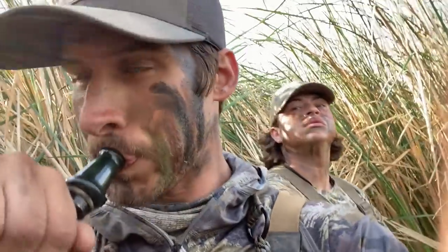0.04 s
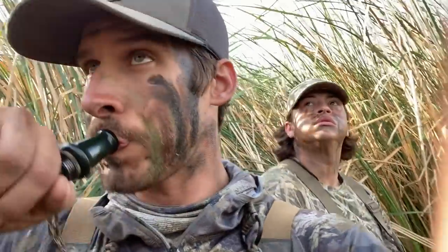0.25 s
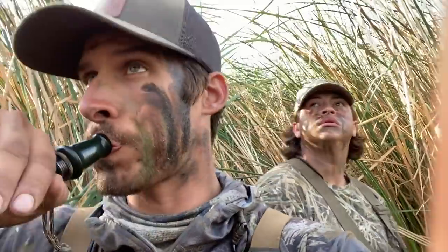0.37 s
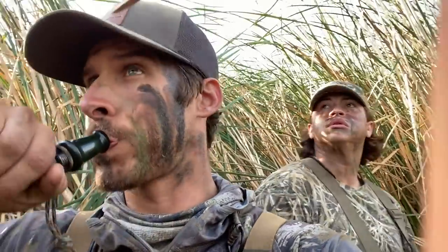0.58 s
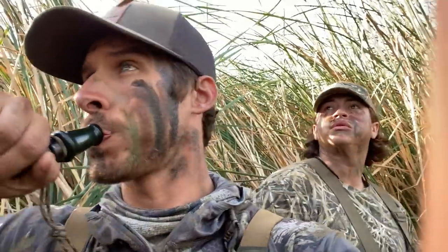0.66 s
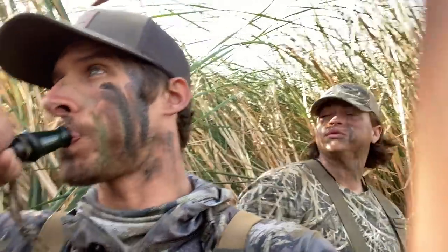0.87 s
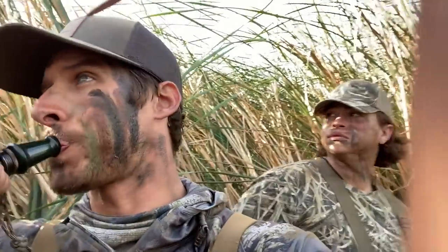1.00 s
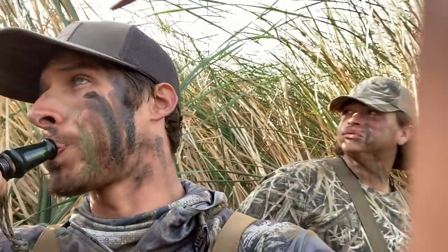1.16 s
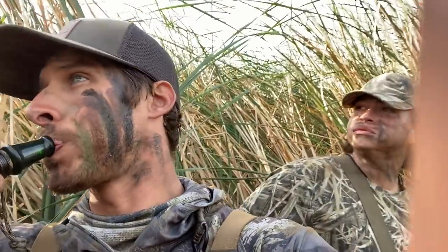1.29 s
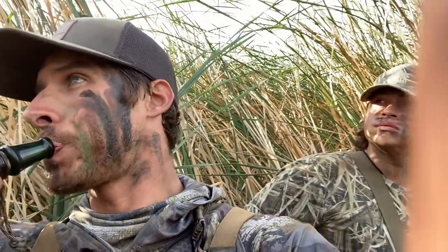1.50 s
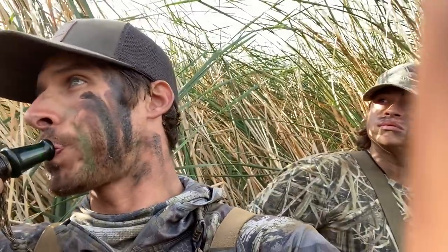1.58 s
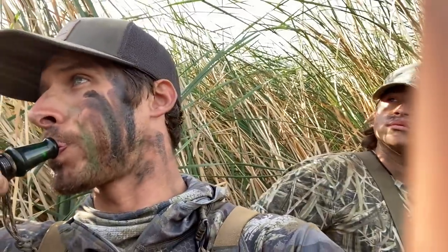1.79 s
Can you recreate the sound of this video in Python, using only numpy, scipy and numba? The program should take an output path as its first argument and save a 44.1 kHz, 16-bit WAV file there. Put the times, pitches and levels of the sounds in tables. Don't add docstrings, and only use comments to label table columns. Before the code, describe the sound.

Three short, evenly spaced nasal duck-call quacks blown close by, getting weaker, in a quiet marsh

```python
import sys
import numpy as np
from scipy import signal
from scipy.fft import rfft, irfft
from scipy.io import wavfile
from numba import njit

SR = 44100
rng = np.random.default_rng(int(sys.argv[2]) if len(sys.argv) > 2 else 0)


def dump(signal):
    limited = np.clip(np.atleast_2d(signal).T, -1, 1)
    pcm = np.round(limited * 32767).astype(np.int16)
    wavfile.write(sys.argv[1], SR, pcm)


def volts(x):
    e = np.asarray(x, float) / 20
    return 10 ** e


N = 81585
T = np.arange(N) / SR
QUACK = (T / .62).astype(int)

# start_s, level_db
FREE = [
    (.378, -61.5),
    (0.994, -42),
    (1.618, -45.5),
]


def level(x, db):
    return x * volts(db) / np.sqrt(np.mean(x ** 2))


@njit
def svf(x, hz, width):
    y, band_state, low_state = np.empty(len(x)), 0., 0.
    for i in range(len(x)):
        g, k = np.tan(np.pi * hz[i] / SR), width / hz[i]
        v = (band_state + g * (x[i] + 1e-18 - low_state)) / (1 + g * (g + k))
        band_state, low_state, y[i] = 2 * v - band_state, low_state + 2 * g * v, k * v
    return y


def band(x, hz, width, order=2):
    for _ in range(order):
        x = svf(x, hz + np.zeros(len(x)), 1. * width)
    return x


def noise_band(hz, width, db):
    return level(band(rng.standard_normal(N), hz, width), db)


def colour(x, points, lead=((0, 0), (1, 0))):
    f, p = np.arange(N // 2 + 1) * SR / N + 1, np.array(points)
    gain = volts(np.interp(np.log(f), np.log(p[:, 0] + 1), p[:, 1]))
    delay = np.exp(-1j * np.interp(f, *np.array(lead).T))
    return irfft(rfft(x) * gain * delay, N)


def clicks(times, sizes):
    out, at = np.zeros(N + 32), times * SR
    k = at.astype(int)[:, None] + np.arange(-7, 9)
    d = k - at[:, None]
    np.add.at(out, k, sizes[:, None] * np.sinc(d) * np.cos(np.pi * d / 16) ** 2)
    return out[:N]


def marsh():
    # time_s, level_db
    background_level = [(0.0, -58.5), (0.144, -60), (0.17, -54), (0.314, -66.5), (0.406, -74.5), (0.69, -64.5),
                        (0.772, -66.5), (0.886, -64), (1.06, -73), (1.122, -68), (1.144, -73.5), (1.442, -69.5),
                        (1.566, -65), (1.628, -77), (1.834, -68.5), (1.85, -90.5)]
    # pitch_hz, level_db
    rumble = [(25, -19.5), (50, -5), (88, 1.5), (130, -6), (180, -11.5), (260, -22.5), (400, -30.5)]
    # pitch_hz, density_db_per_hz
    hush_points = [(240, -30), (400, -12), (700, -17), (2150, -12), (2900, -28), (8000, -31), (10500, -41),
                   (14000, -39)]
    db = np.interp(T, *np.array(background_level).T)
    points = [(10, -47.5)] + rumble + [(800, -58.5)]
    mid, side = (level(colour(rng.standard_normal(N), points), 0) for _ in range(2))
    wind = mid + volts(-10.5) * side * np.array([[1], [-1]])
    hush = np.array([level(colour(rng.standard_normal(N), hush_points), -84.5) for _ in range(2)])
    return volts(db) * wind + hush * volts(.93 * (db + 71.5))


def echo(voice):
    # level_db per quack, the first one blown before the start
    reeds_db = [-51.5, -47, -39, -37.5]
    bank_db = [-7.5, -16, -28.5, -27]
    early = SR
    reed_t60_s, bank_s, bank_spread_s = .42, .27, .043

    def send(db):
        return np.concatenate([voice[:early] * volts(db[0]), voice * volts(db[QUACK + 1])])

    def back(sent, tail):
        return signal.fftconvolve(sent, tail * rng.standard_normal(N) / 30)[early:][:N]

    reeds, bank = send(np.array(reeds_db)), send(np.add(reeds_db, bank_db))
    reeds_tail = volts(-60 * T / reed_t60_s)
    bank_tail = np.exp(-((T - bank_s) / bank_spread_s) ** 2 / 2)
    return np.array([back(reeds, reeds_tail) + back(bank, bank_tail) for _ in range(2)])


def taps():
    # start_s, peak_db, pitch_hz
    knocks = [
        (0.131, -48.5, 490),
        (0.183, -48.5, 312),
        (0.627, -58, 412),
        (0.772, -58.5, 416),
        (1.411, -61, 458),
    ]
    # time_s, level_db
    stems = [
        (0.03, -63),
        (.116, -71.5),
        (0.09, -71),
    ]
    t60_s, edge_db = .022, -14
    out = 0
    for s, db, hz in knocks:
        u = np.clip(T - s, 0, 1)
        swell = volts(db - 60 * u / t60_s) * (1 - np.exp(-u / .001))
        edge = volts(edge_db) * np.sin(2 * np.pi * 3.2 * hz * u)
        out = out + swell * (np.sin(2 * np.pi * hz * u) + edge)
    dry_stems = noise_band(7300, 5000, 0)
    return out + dry_stems * sum(volts(db) * np.exp(-((T - s) / .0014) ** 2) for s, db in stems)


def leak():
    # start_s, level_db
    first_air = [
        (0.198, -60),
        (.797, -70),
        (1.423, -77.5),
    ]
    rise_db_per_s, length_s = 200, .04
    air = noise_band(3900, 350, 0) + noise_band(5700, 900, -16) + noise_band(1800, 1500, -5)
    swell = 0
    for s, db in first_air:
        rise = volts(db + rise_db_per_s * np.clip(T - s, 0, length_s))
        swell = swell + np.clip((T - s) / .0082, 0, 1) * (T < s + length_s) * rise
    return air * swell


def limp(times):
    # time_s, limp_ms, share of groups longer than a pair (0-1)
    table = np.array([(.235, .1, 0), (.25, .2, .1), (.27, .12, 0), (.3, .4, .3), (.35, .35, .5),
                      (.365, .12, 0), (.845, .1, 0), (.865, .22, 0), (.875, .33, 0), (.895, .4, 0),
                      (.9, .36, 0), (.93, .25, 0), (.96, .3, 0), (.99, .1, 0), (1.47, .08, 0),
                      (1.505, .05, 0), (1.52, .4, .5), (1.54, .08, 0), (1.555, .4, 0), (1.59, .3, 0),
                      (1.615, .1, 0)])
    luck = rng.random((len(times), 2))
    place, i = np.zeros(len(times)), 0
    while i < len(times):
        more = np.interp(times[i], table[:, 0], table[:, 2])
        size = 2 + (luck[i, 0] < more) * (1 + (luck[i, 1] < .3))
        place[i:i + size] = np.linspace(.5, -.5, size)[:len(times) - i]
        i += size
    return place * np.interp(times, table[:, 0], table[:, 1]) / 1000, place


def ringing(slaps, soft, bore_db, bore_hz):
    # pitch_hz, width_hz, level_db
    modes = [(780, 120, 2), (1084, 638, 2.5), (1564, 280, 7)]
    barrel = level(sum((-1) ** k * volts(d) * band(soft, f, w) for k, (f, w, d) in enumerate(modes)), 0)
    bore = band(slaps, 2175, 1800)
    upper = band(bore, 2471 + bore_hz - 2100, 393, order=1)
    bore = level(band(bore, bore_hz, 478, order=1) - volts(-5.5) * upper, 0)
    return barrel + volts(bore_db) * bore


def reed_tone(turns, hz, starts):
    octave_db = [-4.5, -21, -50.5]
    octave = volts(np.interp(T, starts, octave_db)) * np.clip((hz - 300) / 50, 0, 1)
    return volts(-16) * np.sin(2 * np.pi * turns) + octave * np.sin(4 * np.pi * turns)


def air_flow(gain, bore_db):
    air_db = [-2.5, -1, -1.5]
    fade_db = [-59, -36, -44.5]
    pole = 1 / (.0025 * SR)
    flow = signal.lfilter([pole], [1, pole - 1], gain * volts(.5 * bore_db + np.array(air_db)[QUACK]))
    for (s, _), db in zip(FREE, fade_db):
        flow = flow + np.clip((T - s) / .004, 0, 1) * volts(db - 1210 * np.abs(T - s))
    return flow


def air_hiss(slaps, flow):
    # pitch_hz, width_hz, level_db
    modes = [(3916, 1190, 7), (5800, 990, -1), (7704, 1570, -2.5), (9510, 2000, -7.5), (11780, 1300, -11.5),
             (14040, 760, -27.5)]
    low_db = [-5, -2, 1.5]
    top_db = [3.5, -2, -3]
    gate = signal.lfilter([1], [1, -np.exp(-360 / SR)], np.abs(slaps))
    air = [level(gate * rng.standard_normal(N), 0) for _ in range(3)]
    shared = air[0] + level(slaps, -3.5)

    def ring(x):
        out = 0
        for k, (f, w, db) in enumerate(modes):
            db = db + (k == 0) * np.array(low_db)[QUACK] + (k > 3) * np.array(top_db)[QUACK]
            out = out + (-1) ** k * volts(db) * band(x, f, w)
        return out

    return [level(ring(shared + volts(-6) * own), -12) * flow for own in air[1:]]


def call():
    # time_s, bore_ring_db, slap_rate_hz, barrel_re_bore_db, bore_centre_hz
    first = [
        (0.226, -47, 310.2, 11, 1814),
        (0.246, -11.5, 365.5, -11, 1890),
        (0.266, -12, 361.1, -12.5, 2116),
        (0.354, -18.5, 367.1, -15.5, 2159),
        (0.37, -25, 386.2, -9.5, 2150),
        (0.388, -56.5, 391, -6.5, 2130),
    ]
    second = [
        (0.828, -50, 292.1, 20, 2034),
        (0.835, -45.5, 296, 2.5, 2012),
        (0.854, -20.5, 356, -8.5, 2007),
        (0.876, -16.5, 348.9, -10.5, 2055),
        (.898, -15.5, 353.5, -10.5, 2099),
        (0.907, -19, 353.4, -11.5, 2110),
        (0.946, -21.5, 380.5, -9.5, 2081),
        (0.974, -21, 378, -11.5, 2110),
        (0.988, -30, 403, -4.5, 2096),
        (0.997, -41.5, 416.1, 8, 2083),
    ]
    third = [
        (1.452, -52, 295, 11.5, 2061),
        (1.458, -51.5, 298.6, 4, 2104),
        (1.476, -28, 347.6, -10, 2100),
        (1.512, -17.5, 358.6, -10, 2142),
        (1.582, -23.5, 363.3, -12, 2073),
        (1.611, -33, 402.9, -5, 2070),
        (1.623, -74.5, 403.8, 24, 2026),
    ]
    # centre_hz for each quack, width_hz
    notches = [([570, 650, 670], 240), ([3250, 3200, 3150], 350), ([3300, 3300, 3250], 350),
               ([10600] * 3, 900)]
    catch_sag, catch_s = .2, .006493
    jitter_ms, scatter_db, group_lead_db, barrel_limp, wobble_db = .03, .9, -1, 1.4, 1.5

    quacks = (first, second, third)
    starts = [q[0][0] for q in quacks]
    rows = np.vstack(quacks)
    ring_db, hz, barrel_db, bore_hz = (np.interp(T, rows[:, 0], rows[:, k]) for k in range(1, 5))
    bore_db = -barrel_db
    on = sum(np.clip(np.minimum(5 * (T - q[0][0]), q[-1][0] - T) / .0043, 0, 1) for q in quacks)
    gain = on * volts(ring_db + barrel_db)

    hz = hz * (1 - catch_sag * sum((T >= s) * np.exp(-np.abs(T - s) / catch_s) for s in starts))
    turns = np.cumsum(hz) / SR
    for s in starts:
        turns[T >= s] += (.6 - np.interp(s, T, turns)) % 1

    beat = np.interp(np.arange(2, int(turns[-1]) - 1), turns, T)
    shift, place = limp(beat)
    luck = rng.standard_normal((len(beat), 2))
    beat = beat + luck[:, 0] * jitter_ms / 1000
    size = volts(scatter_db * luck[:, 1] + group_lead_db * place)
    slaps = clicks(beat + shift, size)
    soft = clicks(beat + barrel_limp * shift, size)

    rung = gain * ringing(slaps, soft, bore_db, bore_hz)
    tone = reed_tone(turns, hz, starts) * volts(wobble_db * np.interp(T, beat, luck[:, 1]))
    puff = level(band(soft, 280, 190), -8.5) * volts(-.6 * np.maximum(bore_db, -4))
    hiss = air_hiss(slaps, air_flow(gain, bore_db))
    for centres, width in notches:
        centre = np.array(centres)[QUACK]
        rung, *hiss = (x - band(x, centre, width, order=1) for x in (rung, *hiss))
    return rung + gain * (tone + puff), np.array(hiss)


def free_reed():
    # multiple, level_db
    orders = [(1, -7.5), (2, -0.5), (3, 6), (4, 9)]
    start_hz, sag_hz_per_s, rise_s, length_s = 700, 7500, .007, .021
    out = 0
    for s, db in FREE:
        u = np.clip(T - s, 0, .1)
        turns = start_hz * u - sag_hz_per_s * u ** 2 / 2
        shape = np.clip(u / rise_s, 0, 1) * np.exp(-(u / length_s) ** 3) * volts(db)
        for k, d in orders:
            out = out + volts(d) * shape * np.exp(-(k - 1) * u / .021) * np.sin(2 * np.pi * k * turns)
    return out


def scene():
    # pitch_hz, left_minus_right_db
    ports = [(60, 0), (200, 2.5), (370, 2), (680, 6), (1250, 0), (2300, -2), (4220, -1.5), (7750, .5)]
    # pitch_hz, lead_radians
    lead = [(0, 0), (360, .4), (900, .75), (1300, 1.05), (2100, 1.95), (3100, 3.0), (4800, 4.6),
            (8700, 7.8), (10500, 9.4), (12000, 12), (15000, 14.5)]
    swing = [.93, 1.06, 1.14]
    voice, hiss = call()
    near = voice + free_reed() + leak() + hiss
    half = np.array(ports) * [1, .5]
    left, right = colour(near[0], half), 0
    for k, turn in enumerate(swing):
        late = [(f, r * (turn if f < 4000 else 1)) for f, r in lead]
        right = right + colour(near[1] * (QUACK == k), half * [1, -1], late)
    return volts(2.0) * np.array([left, right]) + echo(voice) + taps() + marsh()


def top_cut(x):
    return signal.sosfilt(signal.butter(12, 14840, fs=SR, output="sos"), x)


def record(dry):
    mix = np.tanh(dry * 0.82) / 0.7
    return top_cut(mix)


dry = scene()
out = record(dry)
dump(out)
```